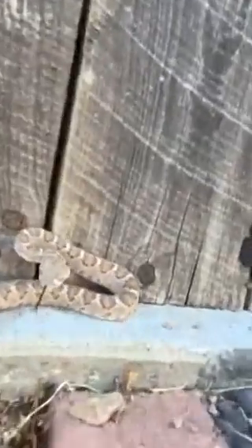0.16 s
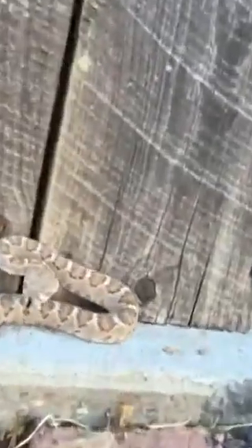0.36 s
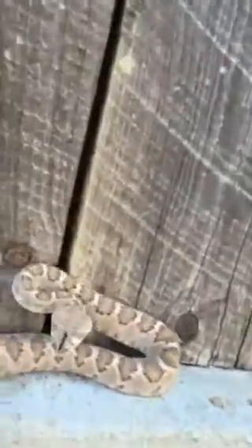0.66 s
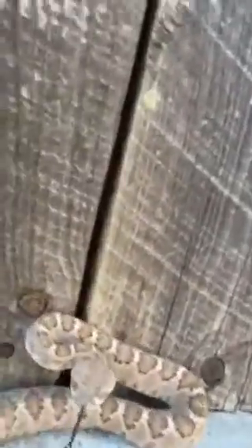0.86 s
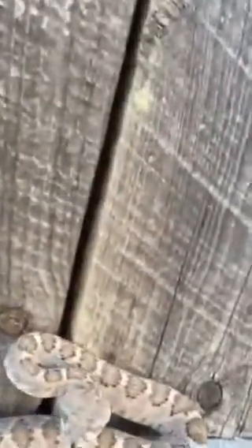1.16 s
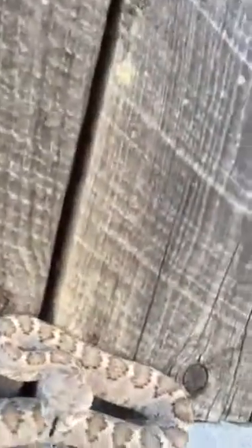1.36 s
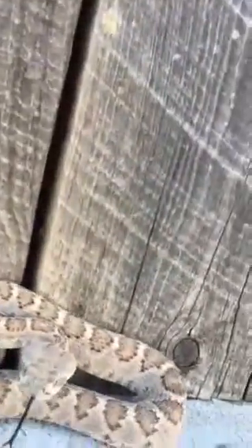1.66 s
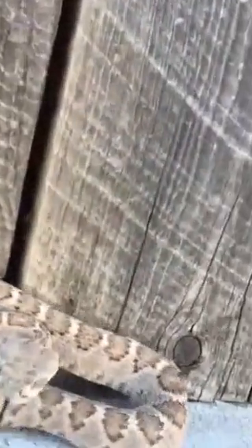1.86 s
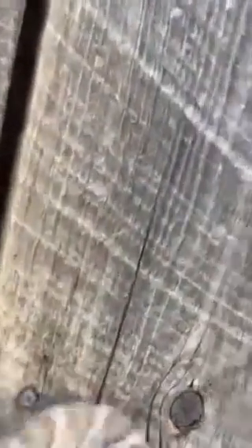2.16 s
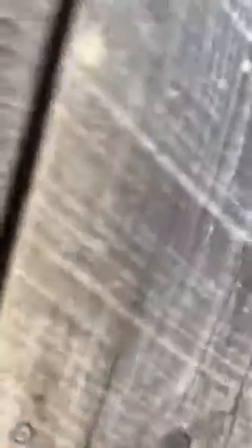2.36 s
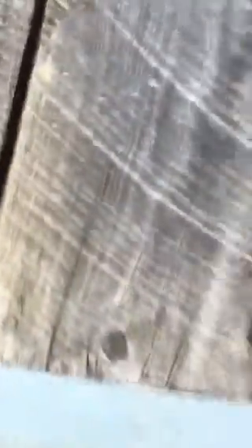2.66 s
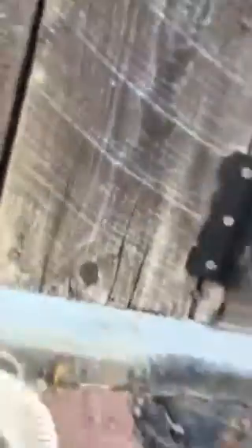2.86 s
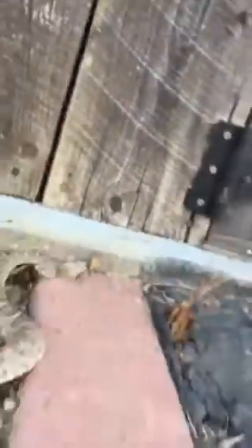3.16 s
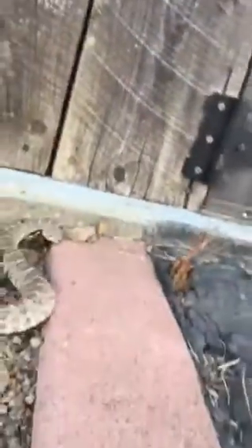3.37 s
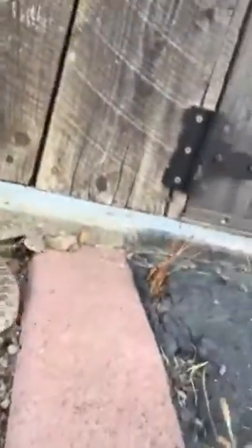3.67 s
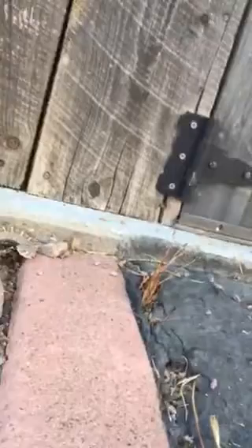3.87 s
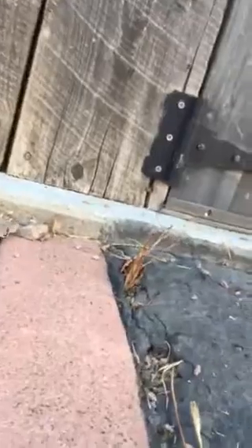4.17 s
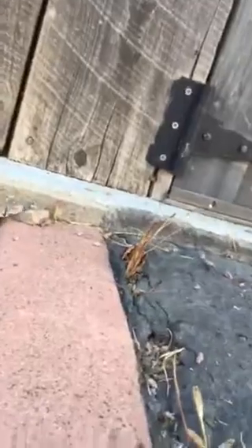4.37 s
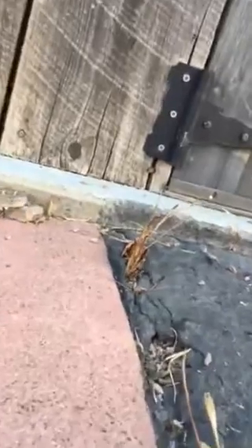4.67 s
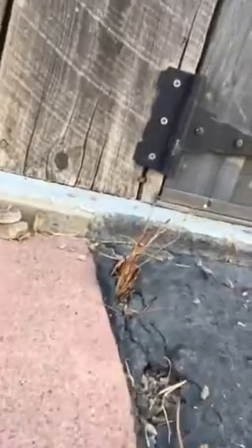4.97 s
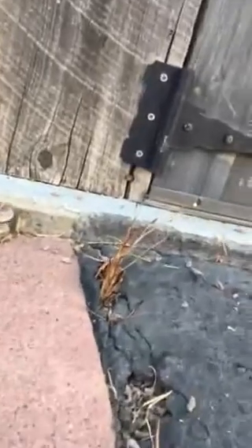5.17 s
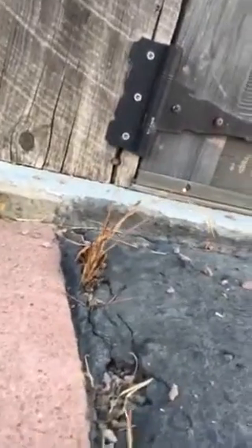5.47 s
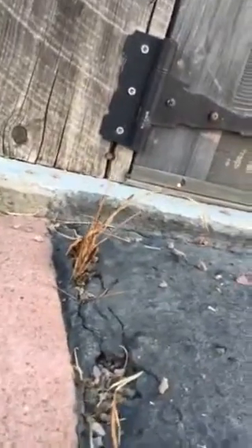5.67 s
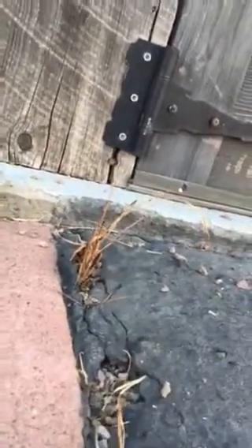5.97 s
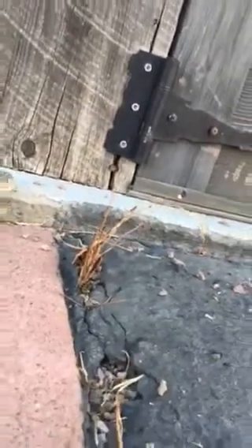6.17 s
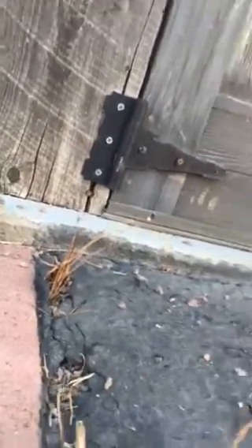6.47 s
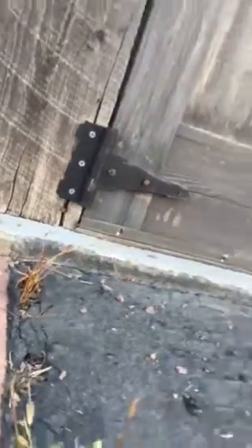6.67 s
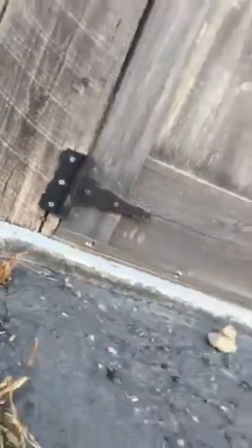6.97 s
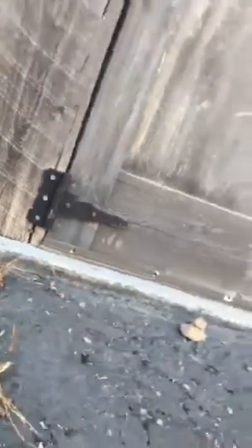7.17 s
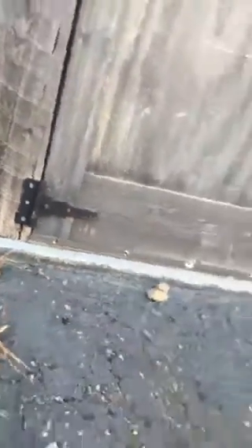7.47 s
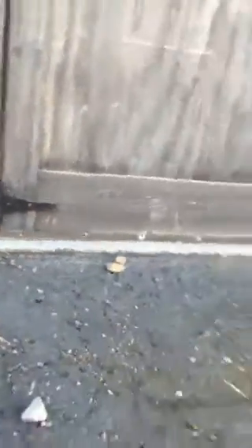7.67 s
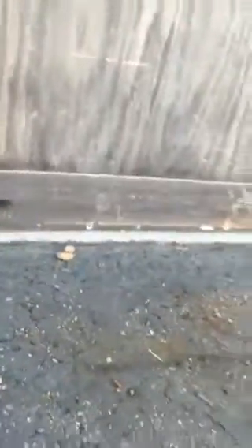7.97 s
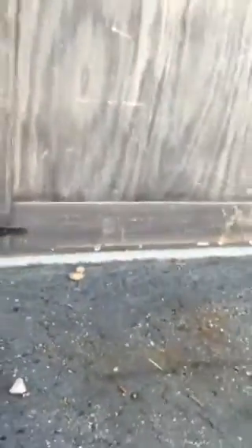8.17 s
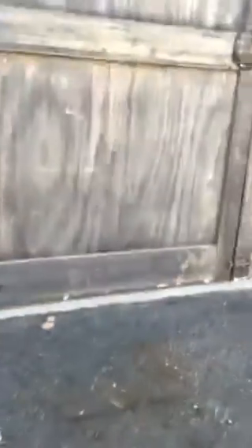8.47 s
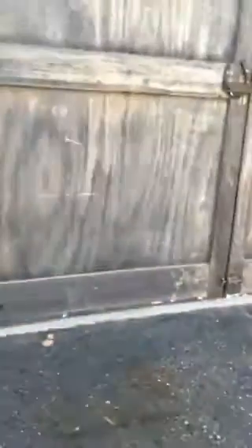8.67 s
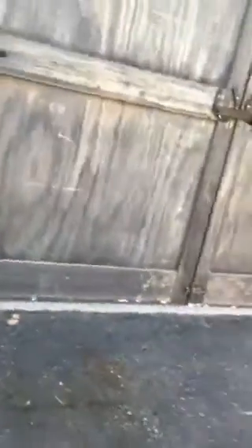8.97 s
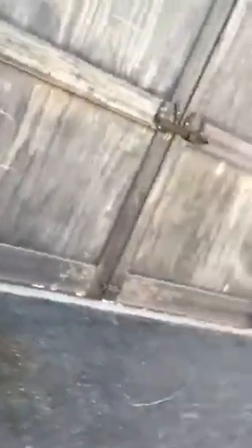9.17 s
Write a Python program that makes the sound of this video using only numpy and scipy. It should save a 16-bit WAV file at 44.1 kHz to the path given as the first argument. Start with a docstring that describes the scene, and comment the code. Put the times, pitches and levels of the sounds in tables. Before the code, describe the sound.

A close handheld microphone outdoors catches a rattlesnake's tail buzzing without a break: a dry, bright, sizzling rattle of tiny hollow clicks, about a hundred swings a second. Soft low wind bumps accompany the first second as the buzz swells to its strongest around 1 to 2 s. At 2.24 s a heel lands with a hard short thump and a gritty crack, and the rattle flickers and dips until about 3.3 s as the microphone swings, with small scuffs. From 3.6 s it is weaker, recovering somewhat around 5 s. Heavy, fluttering wind puffs thud at 4.2 to 4.8 s, with more from 5 to 5.6 s and at 6.4 s. After 7 s the rattle thins into the distance. Shoe scrapes follow at 7.5 to 7.8 s and 8.45 s, strong wind blows at 8.1 and 8.6 s, a kicked stone clicks at 8.8 s, and booming gusts with a scuff close at 9.2 s.

```python
"""At the foot of a wooden shed a rattlesnake buzzes while the microphone is carried away from it.
Each swing of the tail knocks hollow segments together: clusters of clicks, echoed by ground, wall and kerb.
Wind is shaped noise that swells in gusts and breaks as puffs on the microphone.
Shoes scuff on grit as bursts of grainy noise and squeak; a heel lands hard and a kicked stone rings.
A faint hush of open ground and the microphone's own hiss lie under all of it."""
import sys
import numpy as np
from scipy import signal
from scipy.fft import rfft, irfft, next_fast_len
from scipy.io import wavfile
from scipy.ndimage import uniform_filter1d, map_coordinates

SR = 44100
rng = np.random.default_rng(int(sys.argv[2]) if len(sys.argv) > 2 else 0)


def wav_record(signal):
    """Record a signal, one row per channel, as 16-bit PCM in the file named by sys.argv[1]."""
    frames = np.transpose(np.atleast_2d(signal))
    bounded = np.clip(frames, -1, 1)
    # unit amplitude maps onto the largest positive 16-bit level
    quanta = np.round(bounded * 32767).astype(np.int16)
    wavfile.write(sys.argv[1], SR, quanta)


N = 410571


def amp(db):
    """Decibel law: the amplitude gain of a level in dB."""
    return 10 ** (np.asarray(db) / 20)


def unit(x):
    """Normalisation: x at rms 1."""
    return x / np.sqrt(np.mean(x ** 2) + 1e-20)


def curves(rows):
    """Linear interpolation: one value per sample for each column after the time."""
    s, *cols = np.transpose(rows)
    return [np.interp(np.arange(N) / SR, s, c) for c in cols]


def wobble(rate):
    """Slow random modulation: a smooth curve through random knots, rate of them a second."""
    knots = rng.standard_normal(int(N * rate / SR) + 4)
    return map_coordinates(knots, [np.arange(N) * rate / SR])


def filtered(x, response):
    """Linear filtering: the spectrum of x times a response of frequency."""
    m = next_fast_len(N + 8192)
    return irfft(rfft(x, m) * response(np.fft.rfftfreq(m, 1 / SR)), m)[:N]


def coloured(x, spectrum, band=lambda hz: 1):
    """Spectral shaping: x through (Hz, dB) points on a log axis, and through a band if given."""
    f, db = np.transpose(spectrum)
    return filtered(x, lambda hz: band(hz) * amp(np.interp(np.log(hz + 1), np.log(f), db)))


def noise(spectrum):
    """Coloured noise: fresh random samples shaped by a spectrum, at rms 1."""
    return unit(coloured(rng.standard_normal(N), spectrum))


def clicks(at, size):
    """Band-limited impulses: windowed sinc pulses at fractional sample positions."""
    tap = np.arange(-4, 6)
    whole = np.floor(at).astype(int)[:, None]
    off = whole + tap - at[:, None]
    pulse = np.sinc(off) * (1 - (off / 5) ** 2) ** 2
    place = np.clip(whole + tap, 0, N).ravel()
    return np.bincount(place, (pulse * size[:, None]).ravel(), N + 1)[:N]


def bursts(s, db, rise, t60):
    """Exponential decay: an envelope of events that rise and die away, t60 seconds per 60 dB."""
    env, t = np.zeros(N + SR), np.arange(SR // 6) / SR
    for start, level, up, life in np.broadcast(s, db, rise, t60):
        attack = (1 - np.exp(-2 * t / max(up, 1e-4))) ** 2
        decay = amp(level - 60 * t / max(life, .005))
        env[round(start * SR):][:len(t)] += decay * attack
    return env[:N]


def even(x, span):
    """Gain control: x with its slow swells, longer than span seconds, levelled out."""
    return x / np.sqrt(np.abs(uniform_filter1d(x ** 2, size=round(span * SR))) + 1e-12)


def patchy(x, depth_db):
    """Time-frequency modulation: random patches a few hundred Hz by a few hundredths of a second."""
    z = signal.stft(x, nperseg=512)[2]
    field = uniform_filter1d(rng.standard_normal(z.shape), size=5, axis=0)
    field = uniform_filter1d(field, size=7, axis=1)
    return signal.istft(z * amp(depth_db * unit(field)), nperseg=512)[1][:N]


def tail_swings():
    """Periodic excitation: the tail's phase in swings, with each cluster's start, spread and force."""
    # Speed of the tail. Each row: time in seconds, swings per second.
    swing_rate = [(0.0, 97.32), (0.92, 106.35), (1.98, 102.46), (2.11, 105.43), (2.34, 112.32),
                  (2.59, 108.85), (2.8, 110.97), (3.08, 109.45), (3.29, 110.78), (3.58, 106.51),
                  (4.85, 102.2), (7.17, 100.7), (7.27, 99.7), (9.31, 97.93)]
    # Clusters in one swing. Each row: start as a share of the swing, scatter of the start
    # (same share), length scale (same share), level in dB before random variation.
    clusters = [(0, .014, .045, -2), (.22, .035, .06, 2), (.45, .05, .07, -3.5), (.08, .04, .26, -5)]
    first_swing, backswing_db = -.21, -1.5  # swings; every second swing is weaker
    turns = np.cumsum(curves(swing_rate)[0]) / SR
    swing = np.arange(-1, int(turns[-1]) + 1)[:, None] + first_swing
    start, scatter, length, db = np.transpose(clusters)
    begin = swing + start + scatter * rng.standard_normal((len(swing), len(start)))
    force_db = db + backswing_db * (np.arange(len(swing))[:, None] % 2)
    force_db = force_db + rng.normal(0, .8, swing.shape) + rng.normal(0, 1.1, begin.shape)
    return turns, begin, length, force_db


def swinging_about():
    """Depth of modulation in dB while the microphone swings about, and its random knots a second."""
    # The flicker of every range: start in seconds, end in seconds, depth in dB, changes per second.
    flicker = 2.28, 3.35, 2.5, 55
    first, last, depth_db, rate = flicker
    depth, = curves([(first - .05, 0), (first, depth_db), (last, depth_db), (last + .05, 0)])
    return depth, rate


def echo_paths():
    """Path difference: how far each reflection trails the direct sound, in ms, and its share of it."""
    # Ground and wall. Each row: time in seconds, ground lag in ms, ground share, wall lag in ms,
    # lags before roughness.
    ground_wall = [(0, .2, .55, .34), (1.1, .225, .4, .55), (2.1, .22, .45, .5), (2.9, .14, .4, .47),
                   (3.3, .19, .35, .55), (3.6, .22, .33, .95), (5.2, .22, .25, .95), (5.6, .22, .15, .73),
                   (5.9, .37, .15, .71), (6.6, .55, .25, .91), (7.2, .48, .3, .945), (8.2, .48, .3, 1.08),
                   (8.7, .48, .35, 1.02)]
    # Third echo, off kerb and door. Each row: time in seconds, lag in ms before sway and roughness, share.
    third_echo = [(0, .4, 0), (2.25, .4, 0), (2.35, .4, .25), (3.25, .45, .3), (3.6, .58, .6),
                  (5.4, .585, .55), (5.9, .56, .35), (6.45, .73, .55), (7.9, .725, .5), (8.5, .72, .1)]
    sway_ms, sways_per_s = .04, 12  # wander of the third lag, in ms for each dB of flicker
    kerb_ms, kerb = curves(third_echo)
    kerb_ms = np.abs(kerb_ms + sway_ms * swinging_about()[0] * wobble(sways_per_s))
    return [*curves(ground_wall), kerb_ms, kerb]


def echoed(at, size, paths):
    """Image sources: each click returns from ground, wall and kerb, then as diffuse scatter."""
    rough_ms, kerb_rough_ms = .01, .022  # uneven surfaces blur each echo's lag
    wall_share_per_ms = .33  # the wall gains on the direct sound as the microphone backs away
    ground_ms, ground, wall_ms, kerb_ms, kerb = [c[at.astype(int)] for c in paths]
    ground_ms, wall_ms = [ground_ms, wall_ms] + rough_ms * rng.standard_normal((2, len(at)))
    kerb_ms = kerb_ms + kerb_rough_ms * rng.standard_normal(len(at))
    train = clicks(at, size)
    for lag_ms, share in [(ground_ms, ground), (wall_ms, wall_share_per_ms * wall_ms), (kerb_ms, kerb)]:
        train += clicks(at + lag_ms * SR / 1000, share * size)
    # scatter from stones and boards
    tail = rng.standard_normal(2000) * amp(-60 * np.arange(2000) / SR / .045)
    return train + amp(-14) * signal.fftconvolve(train, tail / np.linalg.norm(tail))[:N]


def rattle_levels():
    """Spectral balance: lower edge in Hz, upper edge in Hz and level curve in dB of each range."""
    # The rattle at the microphone before dips and flicker. Each row: time in seconds, ring
    # (6.8-11.5 kHz) in dB, then against the ring 2.4-4.8 kHz in dB, above 11.5 kHz in dB.
    ring_body_top = [(0, -46.5, -6, 6.5), (.5, -43.5, -5, 6.5), (.95, -37.5, -12, -2), (2.2, -40, -8, 3.5),
                     (2.46, -40, -9, -2), (2.67, -43.5, -5, 0), (3.21, -43, -10, -1.5),
                     (3.25, -42, -14.5, -1), (3.6, -51, -9.5, 5), (5.1, -46.5, -14, 1),
                     (5.7, -48.5, -5.5, 7.5), (5.85, -48.5, -6, -0.5), (6.7, -46.5, -16, 2.5),
                     (7.3, -51, -15, 4), (8.3, -56.5, -16.5, 3.5), (8.6, -64.5, -3, 8.5),
                     (9.31, -64, -11, 2.5)]
    # Two more ranges against the ring. Each row: time in seconds, under 2.4 kHz in dB, 4.8-6.8 kHz in dB.
    knock_mid = [(0, -23, -7), (1.2, -33.5, -9), (2.2, -28, -4.5), (2.9, -23, -14), (3.3, -27, -12),
                 (3.6, -19, -2), (5.1, -18.5, -8.5), (5.75, -12, -11), (6.15, -39, -9.5), (6.55, -38, -12),
                 (7.5, -38, -42), (8.6, -35, -8), (9.31, -23, -4)]
    # Brief dips while the microphone swings about. Each row: centre in seconds, length in seconds, dB.
    dips = [(2.335, .03, -6), (2.63, .04, -4), (2.711, .02, -12), (2.735, .035, -6), (3.14, .015, -5),
            (3.327, .02, -7)]
    level_db, body_db, top_db = curves(ring_body_top)
    knock_db, mid_db = curves(knock_mid)
    t = np.arange(N) / SR
    level_db = level_db + sum(db * np.exp(-((t - s) * 2 / span) ** 4) for s, span, db in dips)
    shades = [(300, 2400, knock_db), (2400, 4800, body_db), (4800, 6800, mid_db),
              (6800, 11500, 0), (11500, 20000, top_db)]
    return [(low_hz, high_hz, level_db + shade_db) for low_hz, high_hz, shade_db in shades]


def rattle(count=13):
    """Impact excitation: loose segments strike in clusters, with separate clicks in each range."""
    # Colour of the hollow segments. Each row: frequency in Hz, relative density in dB per Hz.
    shell = [(750, -29.5), (1300, -22), (2400, -20.5), (3600, -21.5), (4200, -18), (4800, -16), (5500, -7),
             (7000, 3), (8800, 11.5), (10300, 4.5), (11600, 0.5), (14400, 3), (16200, -1)]
    turns, begin, length, force_db = tail_swings()
    paths = echo_paths()
    swinging, flickers_per_s = swinging_about()

    def below(hz, edge_hz):
        return 1 / (1 + (hz / edge_hz) ** 9)

    sound = 0
    for low_hz, high_hz, level_db in rattle_levels():
        late = rng.gamma(1.5, 1, begin.shape + (count,))  # delay in cluster lengths
        at = np.interp(begin[..., None] + length[:, None] * late, turns, np.arange(N)).ravel()
        # later clicks are weaker; either sign of pressure
        size = (amp(force_db[..., None] - 1.0 * late) * rng.uniform(-.77, 1, late.shape)).ravel()
        train = echoed(at, size, paths)
        band = coloured(train, shell, lambda hz: below(hz, high_hz) - below(hz, low_hz))
        sound = sound + amp(level_db + swinging * wobble(flickers_per_s)) * unit(band)
    return sound


def gusts():
    """Amplitude modulation: a breeze, plus gusts that swell and fade evenly about their peaks."""
    # Breeze between gusts. Each row: time in seconds, buffet level in dB.
    breeze = [(0, -58.5), (1, -52.5), (1.9, -53), (2.4, -59.5), (2.8, -58), (3.3, -63), (4.0, -56.5),
              (5.3, -55.5), (6.3, -55.5), (6.7, -61), (7.6, -44.5), (8.45, -58), (9, -52), (9.31, -29)]
    # Gusts. Each row: peak time in seconds, buffet in dB before the crest is rounded, flutter against
    # the buffet in dB, seconds to fall by fall_db either side (apart from the rounding).
    gust_rows = [(0.11, -32, -12, 0.07), (0.35, -31, -19, 0.08), (0.78, -36, -30, 0.06),
                 (1.345, -37, -14, 0.05), (1.43, -38, -6, 0.03), (1.57, -45, -11, 0.15),
                 (1.99, -43, -30, 0.08), (2.68, -40, -8, 0.07), (2.95, -38, -12, 0.21),
                 (3.6, -40, -7, 0.11), (3.86, -44, -11, 0.05), (4.14, -41, -30, 0.26), (4.22, -39, 1, 0.03),
                 (4.38, -25, -3, 0.14), (4.57, -23, -5, 0.05), (4.72, -25, -12, 0.06),
                 (4.81, -35, -4, 0.16), (5.07, -31, -13, 0.13), (5.27, -28, -15, 0.06),
                 (5.45, -36, -13, 0.04), (5.57, -30, -7, 0.05), (6.42, -30, -5, 0.03),
                 (6.85, -31, -15, 0.06), (6.93, -40, -5, 0.04), (7.18, -42, -12, 0.04),
                 (7.3, -33, -4, 0.04), (7.44, -36, -4, 0.06), (7.64, -32, -5, 0.07), (7.754, -29, 0, 0.02),
                 (7.88, -36, -8, 0.03), (8.06, -26, -4, 0.05), (8.14, -32, -2, 0.06),
                 (8.34, -39, -14, 0.14), (8.59, -20, -3, 0.04), (8.69, -19, -9, 0.06),
                 (8.84, -28, -10, 0.09), (9.18, -23, 3, 0.07), (9.27, -27, -2, 0.07)]
    fall_db, crest_s = 18, .018  # crest_s rounds a gust's peak
    buffet = amp(curves(breeze)[0])
    flutter, t = amp(-8) * buffet, np.arange(N) / SR
    for s, db, flutter_db, fall_s in gust_rows:
        near = slice(max(round((s - .5) * SR), 0), round((s + .5) * SR))
        swell = amp(db - fall_db * np.hypot(t[near] - s, crest_s) / fall_s)
        buffet[near] += swell
        flutter[near] += amp(flutter_db) * swell
    return buffet, flutter


def wind():
    """Turbulent pressure: eddies buffet the port in lumps; the sharpest break as brighter-edged puffs."""
    # Spectra of buffet, flutter and puff edge. Each row: frequency in Hz, relative density in dB per Hz.
    buffet_colour = [(15, -71), (30, -7), (55, 10.5), (100, 9.5), (135, 0), (220, -76)]
    flutter_colour = [(80, -77), (135, 5.5), (200, -2), (350, -8.5), (600, -27.5), (1100, -66)]
    edge_colour = [(300, -0.5), (550, 6), (900, -12), (1500, -36), (3000, -65)]
    # Puffs breaking on the port. Each row: time in seconds, level in dB before the rise and puff_db,
    # edge against it in dB before a 2 dB lift.
    puff_rows = [(1.429, -36.5, -35), (2.641, -39.5, -3), (2.87, -42, -12), (2.933, -41, -3),
                 (3.584, -38, -33), (4.213, -31, 2), (4.286, -29, -32), (4.31, -26, -8), (4.364, -30, 2.5),
                 (4.553, -24.5, -10.5), (4.587, -26, -9), (4.735, -28, -14), (4.797, -29, -8),
                 (5.565, -36.5, -33), (6.403, -29.5, -24), (6.86, -38.5, -34), (7.177, -49, 1.5),
                 (7.282, -33, -28), (8.043, -31, -36), (8.069, -31, -10), (8.117, -24, -15),
                 (8.556, -24.5, -6.5), (8.682, -21, -17.5), (8.724, -34, -10), (8.823, -27, -19),
                 (9.065, -39, -31), (9.159, -25.5, -8), (9.176, -17, 2), (9.247, -19, 0)]
    puff_db = 5.0
    buffet_gain, flutter_gain = gusts()
    eddy, shiver = np.tanh(wobble(35)), np.tanh(wobble(70))
    flutter = even(amp(6.5 * eddy + 5.5 * shiver) * noise(flutter_colour), .12)
    buffet = even(amp(5.5 * eddy) * noise(buffet_colour), .13)
    s, db, edge_db = np.transpose(puff_rows)
    puffs = bursts(s - .003, db, .0026, .09) * noise(flutter_colour)
    puffs += bursts(s - .003, db + edge_db + 2, .004, .04) * noise(edge_colour)
    return buffet_gain * buffet + flutter_gain * flutter + amp(puff_db) * puffs


def air():
    """Noise floor: the far hush of open ground over the microphone's own hiss."""
    # Colour of the hush. Each row: frequency in Hz, relative density in dB per Hz.
    hush_colour = [(88, -36), (150, 8.5), (243, -31), (524, -15), (652, -12), (1660, -16), (4000, -19),
                   (5200, -26), (8800, -120)]
    hush_db, hiss_db = -65.5, -99  # the hush wavers slowly about its level
    return amp(hush_db + wobble(6.5)) * noise(hush_colour) + amp(hiss_db) * rng.standard_normal(N)


def drags():
    """Stick-slip friction: dragged soles rasp, scuffed stones squeak, and crushed grit is grainy noise."""
    # Scuffs. Each row: time in seconds, level in dB before the rise and contact_db, grit against it
    # in dB before a 0.5 dB cut, 60 dB decay time of the sole in seconds, squeak pitch in Hz.
    scuff_rows = [(0.602, -50.5, -19, 0.066, 750), (0.727, -49.5, 1.5, 0.051, 1470),
                  (2.241, -20.5, -22, 0.015, 1586), (2.263, -29.5, -5, 0.029, 1299),
                  (2.277, -41.5, -20, 0.13, 850), (2.323, -42, -1.5, 0.041, 850),
                  (2.369, -43, -4, 0.03, 1900), (2.57, -45.5, -6, 0.064, 697), (2.64, -53.5, 1, 0.099, 597),
                  (2.912, -48, -12, 0.089, 1300), (3.071, -49.5, -7, 0.056, 699),
                  (3.124, -47, -16, 0.2, 980), (3.179, -49.5, -2, 0.076, 516),
                  (3.206, -52.5, -6, 0.035, 1050), (3.693, -45.5, -22, 0.071, 902),
                  (7.507, -47.5, -4, 0.061, 1950), (7.705, -51, -2, 0.065, 1000),
                  (7.727, -51, -5.5, 0.066, 1300), (7.783, -48.5, -23, 0.063, 602),
                  (7.825, -48.5, -9, 0.1, 1400), (8.427, -53, 6.5, 0.13, 1000),
                  (8.448, -33.5, 0, 0.028, 600), (8.547, -41.5, -8, 0.042, 1410),
                  (8.779, -53, -2, 0.074, 1250), (8.797, -38, -5.5, 0.056, 1257),
                  (9.103, -44, -12, 0.023, 1000), (9.171, -24, -31, 0.024, 879)]
    # Spectra of sole and grit. Each row: frequency in Hz, relative density in dB per Hz.
    sole_colour = [(250, -39), (500, 18.5), (1000, 15.5), (2000, 9), (2800, -27), (5000, -58)]
    grit_colour = [(1500, -10), (2600, -5.5), (6000, -17), (8000, -20), (15000, -35)]
    contact_db, squeak_db = 11.5, -4  # the squeak is set against the rasp
    overtone, overtone_db = 1.6, -8  # frequency ratio; level against the fundamental
    s, db, grit_db, length, hz = np.transpose(scuff_rows)
    t = np.arange(N) / SR
    grain = amp(3.5 * wobble(350) + 3 * wobble(90))
    # the pitch holds until the next scuff
    latest = np.maximum(np.searchsorted(s - .001, t) - 1, 0)
    turn = 2 * np.pi * np.cumsum(hz[latest]) / SR
    squeak = sum(amp(level + 4 * wobble(60)) * np.sin(k * turn + 1.3 * wobble(110))
                 for k, level in [(1, 0), (overtone, overtone_db)])
    rasp = unit(grain * patchy(noise(sole_colour), depth_db=3.5))
    sole = bursts(s - .001, db, .25 * length, length) * unit(rasp + amp(squeak_db) * unit(squeak))
    grit = bursts(s - .001, db + grit_db - .5, .25 * length, 1.3 * length)
    grit = grit * unit(grain * noise(grit_colour))
    return amp(contact_db) * (sole + grit)


def snaps():
    """Brittle fracture: sharp cracks sound as very short bursts of bright noise; the loudest come as the heel
    lands."""
    # Sharp cracks. Each row: time in seconds, level in dB before the rise.
    snap_rows = [(2.2415, -15.5), (2.2444, -19), (2.249, -27), (2.259, -24), (3.001, -31.5), (8.542, -28),
                 (8.465, -42), (8.683, -48), (8.8, -27)]
    # Colour of a snap. Each row: frequency in Hz, relative density in dB per Hz.
    snap_colour = [(600, -47), (1500, 9.5), (7000, 12), (12000, 0), (16000, -9)]
    return bursts(*np.transpose(snap_rows), .0002, .006) * noise(snap_colour)


def heel():
    """Damped oscillation: one heel lands hard as a brief 200 Hz thump."""
    land_s = 2.244
    t = np.arange(N) / SR
    return bursts(land_s, -8.5, .002, .028) * np.sin(2 * np.pi * 200 * (t - land_s) - 1.4)


def stone():
    """Modal ringing: a stone kicked loose sounds its damped modes, their phase shaken by chatter."""
    # Modes of the stone. Each row: frequency in Hz before chatter, level in dB before the rise,
    # 60 dB decay time in seconds.
    pebble = [(2100, -35, 0.062), (2220, -45, 0.18), (6000, -47, 0.1), (6940, -39, 0.047)]
    kick_s = 8.801
    t = np.arange(N) / SR
    chatter = .6 * wobble(150)  # radians
    return sum(bursts(kick_s, level, .00032, t60) * np.sin(2 * np.pi * hz * t + chatter)
               for hz, level, t60 in pebble)


def scene():
    """Superposition: the pressures of all sources add at one microphone."""
    return (rattle() + wind() + air() + drags() + heel() + snaps() + stone())[None]


def record(dry):
    """Band limiting: the response falls to nothing around 16 kHz."""
    top_hz = 16000
    return filtered(dry[0], lambda hz: np.clip((top_hz - hz) / 200 + .5, 0, 1) ** 2)[None]


dry = scene()
out = record(dry)
wav_record(out)
```